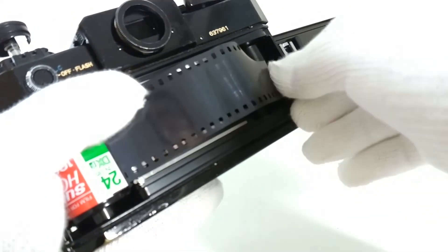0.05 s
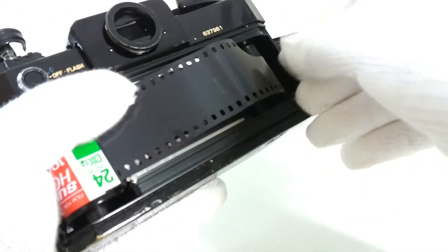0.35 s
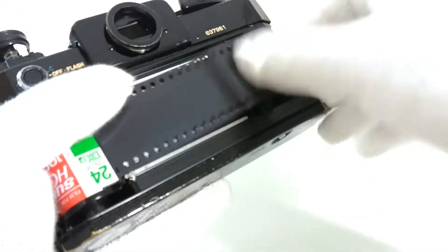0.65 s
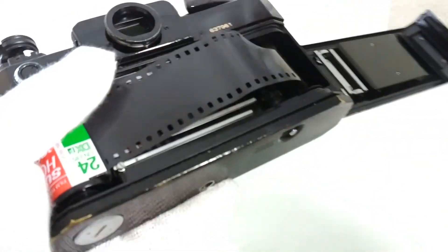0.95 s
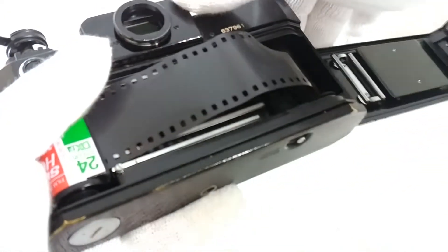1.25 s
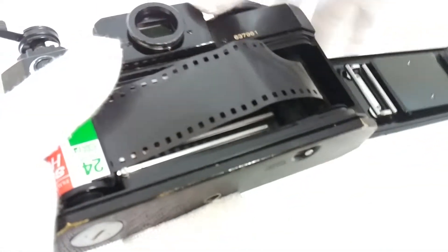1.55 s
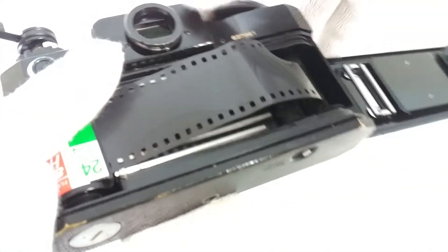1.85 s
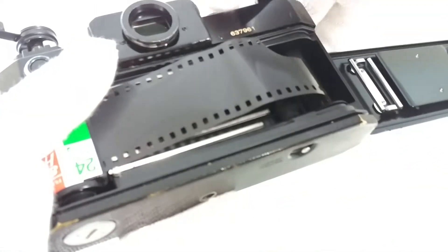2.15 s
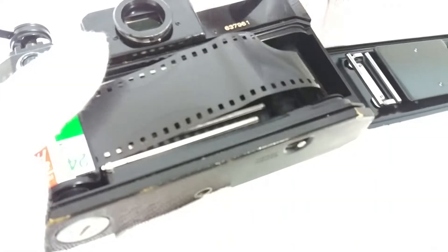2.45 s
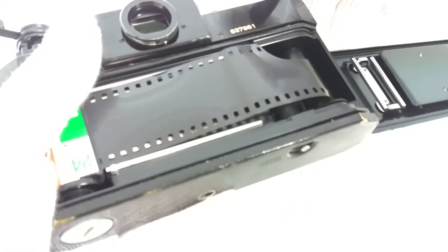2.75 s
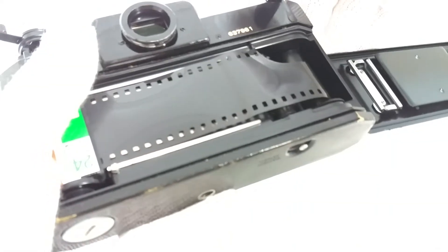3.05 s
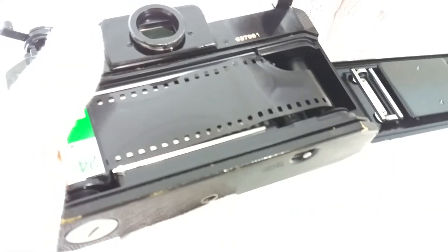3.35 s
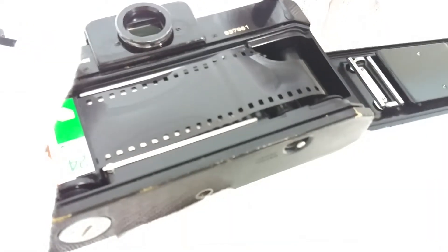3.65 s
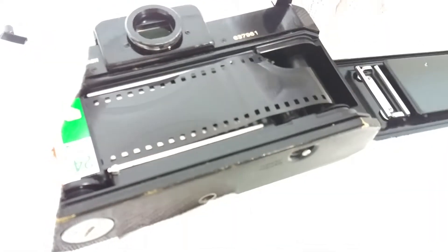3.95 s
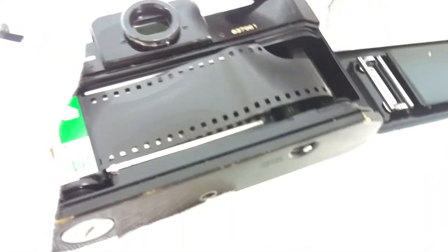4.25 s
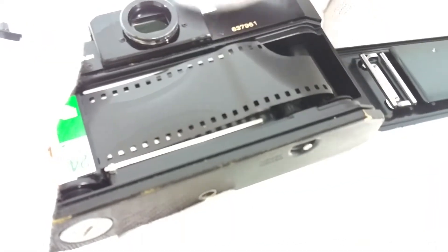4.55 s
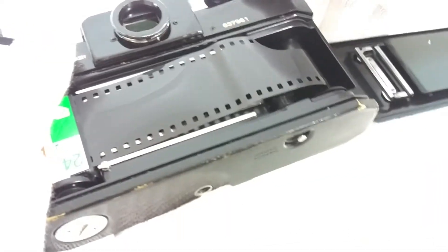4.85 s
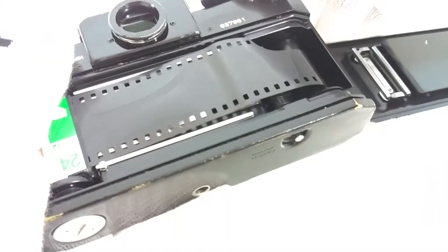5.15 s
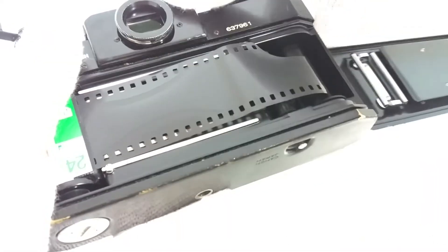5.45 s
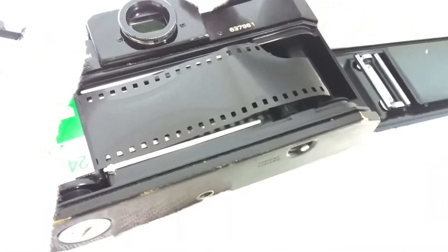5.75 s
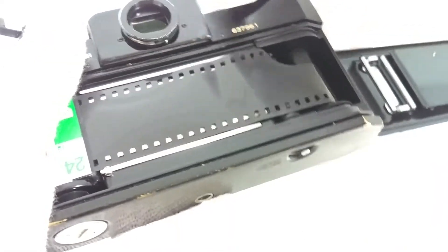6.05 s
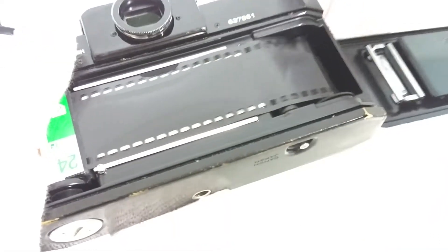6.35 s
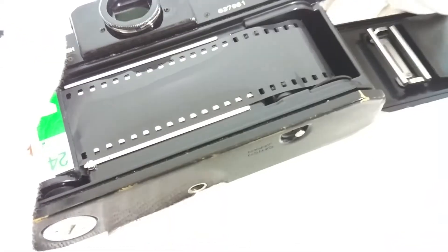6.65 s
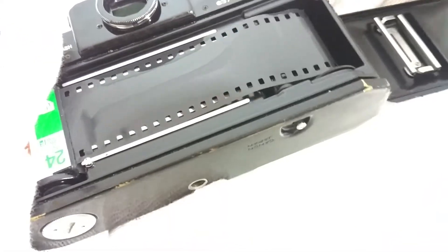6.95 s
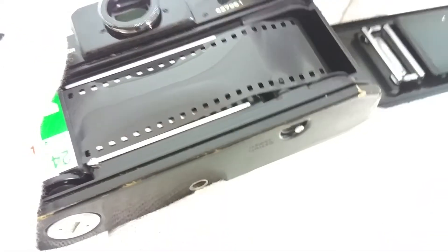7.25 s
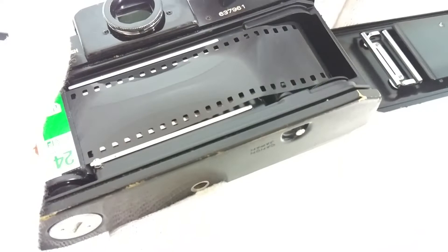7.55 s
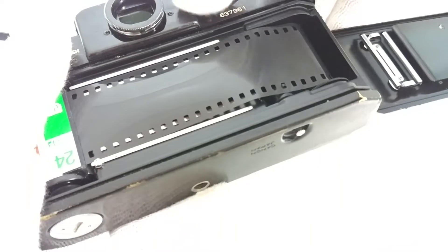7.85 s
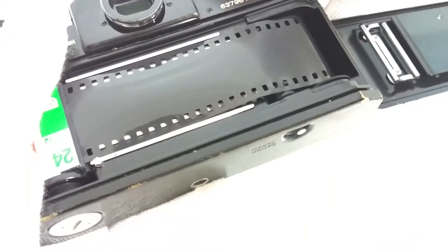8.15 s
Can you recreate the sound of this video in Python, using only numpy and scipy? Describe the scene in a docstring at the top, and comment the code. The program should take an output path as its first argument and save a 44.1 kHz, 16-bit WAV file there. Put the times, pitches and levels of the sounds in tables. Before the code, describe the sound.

Film ticks into an open camera, the shutter fires with sharp metal clacks, and a lever winds on in gritty pulls.

```python
"""A quiet room with a low hum; close up, gloved fingers load film into an open metal camera.
The hinged back knocks against its stop, and the leader ticks and slides into the spool.
The shutter fires, its gear train buzzes through a slow exposure, and the mirror bounces home.
The lever drags the film over the sprockets in gritty pulls and snaps back. Each click is a noise
burst ringing the metal case; underneath, cotton rubs and the camera rocks softly in the hand."""
import sys
import numpy as np
from scipy import signal
from scipy.fft import rfft, irfft, next_fast_len
from scipy.io import wavfile
from scipy.ndimage import uniform_filter1d

SR = 44100
rng = np.random.default_rng(int(sys.argv[2]) if len(sys.argv) > 2 else 0)


def wav_out(sig):
    """Save sig, one row per channel (or a flat mono array), as 16-bit PCM at SR to the path in sys.argv[1]."""
    wavfile.write(sys.argv[1], SR, np.round(np.clip(np.atleast_2d(sig).T, -1, 1) * 32767).astype(np.int16))


N = 371322
TIME = np.arange(N) / SR
TAPS = 8192
BINS = np.fft.rfftfreq(TAPS, 1 / SR)

# release, mirror flip, opening and closing curtain: (time [s], level [dB], knock [dB], ring [Hz], t60 [s])
SHUTTER_HITS = [(5.1475, -4, 0, 2880, .03), (5.1502, 7, 12, 420, .033), (5.157, 5.5, 2, 2500, .05),
                (5.1695, -1.5, 11, 880, .02), (5.183, 2, 2, 7140, .06), (5.1915, 4.5, 1, 5530, .045),
                (5.335, 1.5, 5, 1860, .05), (5.34, 6, 11, 800, .04), (5.344, 7, 8, 1200, .045),
                (5.3565, 2.5, 3.5, 1070, .035)]
# the mirror landing on its rest: (time [s], level [dB], knock [dB], ring [Hz], t60 [s])
MIRROR_DROP = (5.375, 2.5, 7, 3300, .022)
# ticks of film, spool and ratchet: (time [s], level [dB], knock [dB], ring [Hz], t60 [s])
TICK_HITS = [(.0095, -10.5, -12, 5050, .01), (.023, -10.5, -11, 5200, 0.037), (.046, -13.5, -4, 7100, .02),
             (.051, -9.5, 4.5, 4800, .03), (.066, -19, 1, 1460, .035), (.094, -24.5, 1, 2250, 0.054),
             (.33, -33.5, -1, 8050, .025), (1.359, -33, 10, 4930, .045), (1.649, -24, 4, 11000, .04),
             (2.393, -16, 3, 3300, 0.057), (2.403, -16.5, -8, 10000, 0.022), (2.557, -31.5, 8, 2810, 0.044),
             (2.6, -22, 4, 2380, .02), (2.6365, -19, -0.5, 2700, 0.034), (2.6644, -18, 1, 5900, .01),
             (2.887, -19, 1.5, 2900, .02), (2.903, -12.5, -5, 9500, 0.014), (2.905, -29, 11, 1150, .08),
             (4.192, -23, 6.5, 6300, 0.064), (4.266, -26, -1, 6440, 0.028), (4.311, -23.5, 18, 2320, .04),
             (5.479, -30, 5, 2040, .04), (6.078, -23, -2, 13700, 0.062), (6.116, -20.5, 21.5, 1420, .025),
             (6.184, -16.5, 9.5, 2700, .06), (6.2185, -14.5, 3, 3080, .012),
             (6.2465, -19.5, -12, 6600, .02), (6.3385, -3.5, 4, 7100, .008), (6.35, -9.5, 6, 2960, 0.045),
             (6.3995, -8, 3, 2280, .025), (6.408, -11.5, 14.5, 2460, 0.025),
             (6.4585, -11, -12, 8900, 0.017), (6.513, -4.5, -2, 7070, .016), (6.544, -14.5, 7.5, 2350, .04),
             (6.554, -9.5, -13, 5450, 0.028), (6.603, -18, 4, 1390, .05), (6.7105, -15.5, 13, 2550, .035),
             (6.7245, -13, -2, 8350, .014), (6.7315, -9, -8, 9500, .012), (7.017, -26.5, 10, 5240, .05),
             (7.058, -16, 3, 5300, .025), (7.1255, -21, 11, 1600, .05)]
# the ring shared by the metal hits: (frequency [Hz], width [Hz], boost [dB])
METAL_MODES = [(797, 90, 2.5), (1298, 70, 4), (1970, 14, 3), (2150, 50, 1), (2820, 60, 5.5), (3580, 23, 3),
               (4276, 26, 0), (5180, 68, 6), (5540, 120, 9), (6118, 52, 6), (6300, 37, 7.5),
               (8600, 80, 0.5), (9250, 66, 5.5), (15015, 90, 0.5)]
# broad tone shared by the clicks, dipping near 12 kHz: (frequency [Hz], gain [dB])
CLICK_EQ = [(60, -1.5), (200, -2), (7000, -3.5), (10000, -3), (11800, -9), (14000, -1.5), (15500, -2.5)]
# resonances of the slow-speed gear train: (frequency [Hz], width [Hz], gain [dB])
GEAR_MODES = [(1499, 2500, -12.5), (5700, 700, -10), (6520, 300, -13.5), (7100, 350, 1), (9010, 900, -4),
              (10400, 400, -4), (13900, 1100, -5), (15200, 700, -3.5)]
# envelope of the gear whirr: (time [s], level [dB])
GEAR_ENVELOPE = [(5.19, -68), (5.2, -33), (5.22, -45), (5.27, -47), (5.312, -46.5), (5.319, -39),
                 (5.335, -27), (5.35, -56)]
# springs left ringing: (start [s], damped at [s], pitch [Hz], level [dB], t60 [s])
SPRING_RINGS = [(5.194, 5.34, 921, -41.5, 0.5), (5.185, 5.34, 1000, -49, .3), (5.194, 5.34, 2024, -52, .3),
                (5.34, 6.1, 2019, -51.5, .62)]
# pulls of film over the sprockets: (start [s], length [s], level [dB])
FILM_PULLS = [(6.088, 0.087, -56.5), (6.186, 0.068, -48), (6.28, .06, -60), (6.343, .18, -43.5),
              (6.554, 0.072, -41.5), (6.641, 0.12, -54.5)]
# rasp of the dragged film: (frequency [Hz], gain [dB])
RASP_EQ = [(300, -3), (700, 2.5), (1500, 1), (2800, -1.5), (4000, -14.5), (5600, -7.5), (9500, -9),
           (11800, -23), (14500, -17), (16000, -12)]
# the wind lever at its stop: (frequency [Hz], width [Hz], gain [dB])
LEVER_MODES = [(1320, 140, 26.5), (1646, 130, 24.5), (2340, 270, 3), (3030, 200, 6), (3960, 550, 2),
               (5470, 440, -0.5), (7200, 1200, -7), (9800, 900, -19), (13800, 700, -11.5),
               (15500, 600, -28)]
# the hinged back at its stop: (frequency [Hz], width [Hz], gain [dB])
BACK_MODES = [(260, 58, 9.5), (800, 62, 12.5), (1195, 95, 8), (1460, 87, -9), (2000, 200, -24),
              (2570, 54, -0.5), (3420, 147, -16), (4130, 190, -4.5), (4900, 400, -8.5), (5930, 360, -7.5),
              (8500, 500, -24), (10600, 500, -27), (14800, 1200, -25)]
# the leader sliding into its slot: (time [s], level [dB], squeak pitch [Hz])
LEADER_SLIDE = [(2.19, -91, 6040), (2.235, -67, 5510), (2.27, -60.5, 4700), (2.3, -63, 6570),
                (2.35, -75, 6460), (2.39, -65, 6560)]
# resonances of the slot, applied twice over: (frequency [Hz], width [Hz], gain [dB])
SLOT_MODES = [(4130, 380, 1.5), (5050, 300, -5), (5600, 300, 0.5), (6560, 400, -3)]
# the film edge running along the guide rail: (time [s], level [dB])
RAIL_ENVELOPE = [(1.78, -87), (1.91, -74), (2.04, -75.5), (2.12, -88)]
# its faint singing tone: (frequency [Hz], width [Hz], gain [dB])
RAIL_RESONANCES = [(5140, 60, 1), (6400, 90, 5), (8600, 180, -2), (10100, 330, 0)]
# strokes of cotton on the camera: (middle [s], length [s], level [dB])
GLOVE_STROKES = [(0.333, 0.33, -61), (0.746, 0.26, -57.5), (0.888, .15, -55), (1.049, .22, -54),
                 (1.265, .12, -51.5), (1.357, 0.26, -56), (1.62, 0.1, -53.5), (1.719, 0.19, -53.5),
                 (1.99, 0.11, -56), (2.116, 0.12, -55), (2.287, 0.39, -54), (2.66, 0.42, -55),
                 (3.319, 0.093, -58.5), (4.028, 0.086, -55.5), (4.625, 0.17, -61.5), (4.29, 0.4, -54),
                 (7.072, 0.33, -50.5), (7.291, .3, -53.5)]
# light finger slides, one curve before the shutter and one after the winding: (time [s], level [dB])
FINGER_SLIDES = [
    [(0.1, -72), (0.36, -81), (0.68, -80), (0.82, -75.5), (1.2, -73), (1.35, -83), (1.59, -74), (1.76, -76),
     (2.23, -76.5), (2.45, -71), (2.91, -79), (3.15, -89), (4.31, -84), (5.1, -82.5)],
    [(6.8, -70.5), (7.11, -74.5), (7.486, -89.5), (8.4, -90)],
]
# loose film brushing a glove: (middle [s], length [s], level [dB])
FILM_BRUSHES = [(1.63, .14, -72), (3.67, .17, -75), (3.89, .14, -79), (4.75, .25, -81)]
# dull rub of cotton: (frequency [Hz], gain [dB])
RUB_EQ = [(40, -22.5), (100, 2), (250, -4), (500, -10.5), (1000, -15.5), (1500, -19.5), (2800, -25),
          (3600, -43), (6000, -41.5), (12000, -58.5)]
# fine hiss of its fibres: (frequency [Hz], gain [dB])
FIBRE_EQ = [(1500, -17.5), (3000, 0), (4400, -3), (6300, -2), (7800, -3.5), (10000, -2.5), (11900, -6.5),
            (14500, -0.5), (16000, -0.5)]
# pushes of the hand and blows of the shutter that rock the camera: (time [s], pitch [Hz], level [dB])
BODY_BUMPS = [(.328, 48.2, -38.5), (1.02, 68, -43), (2.369, 85, -42), (2.549, 58.4, -41),
              (4.292, 100, -37.5), (5.15, 126, -32.5), (5.184, 62, -36), (5.331, 162, -30.5),
              (6.313, 91.6, -31), (6.334, 148, -32.5), (6.754, 48, -29.5), (7.028, 111.7, -32),
              (7.063, 58, -32.5), (7.24, 60, -39)]
# tones of the hum: (pitch [Hz], level [dB])
HUM_TONES = [(49, -52.5), (100, -63)]
# still air of the room: (frequency [Hz], gain [dB])
ROOM_TONE_EQ = [(15, -34.5), (28, -23.5), (42, -7), (62, -11), (80, -0.5), (120, -2.5), (160, -6.5),
                (400, -15), (630, -17), (1600, -31.5), (2800, -34.5), (4000, -44), (6300, -52.5),
                (10000, -48.5), (16000, -52)]
# decay of the room tail: (frequency [Hz], t60 [s])
REVERB_DECAY = [(200, 0.18), (1500, 0.24), (5000, 0.19), (15000, .2)]
# send to the room tail: (frequency [Hz], gain [dB])
REVERB_SEND = [(200, -20.5), (1500, -22), (5000, -18.5), (15000, -27.5)]


def shutter():
    """The release trips, the mirror flips up and two curtains slam home: full-bodied metal clacks."""
    return metal_hits(SHUTTER_HITS, ring_db=8, thud_db=-1, thud_share=.45, sizzle_db=-.5,
                      dulling=.04, metal_share=1, tail_db=-14.5, tail_t60=.21)


def mirror(first_gap_s=.035, gap_ratio=.53, loss_db=8, count=5):
    """The mirror drops onto its rest, each bounce sooner and softer."""
    start, db, knock_db, ring_hz, t60 = MIRROR_DROP
    gaps = first_gap_s * gap_ratio ** np.arange(count - 1)
    times = start + np.r_[0, np.cumsum(gaps)]
    bounces = [(at, db - k * loss_db, knock_db, ring_hz, t60) for k, at in enumerate(times)]
    return metal_hits(bounces, ring_db=12, thud_db=-6.5, thud_share=.33, sizzle_db=-2.5,
                      dulling=.2, metal_share=1, tail_db=-15, tail_t60=.21)


def ticks():
    """Film, spool and ratchet catch with small pitched clicks."""
    return metal_hits(TICK_HITS, ring_db=12.5, thud_db=-5, thud_share=.71, sizzle_db=-1,
                      dulling=.19, metal_share=.7, tail_db=-11, tail_t60=.2)


def metal_hits(rows, ring_db, thud_db, thud_share, sizzle_db, dulling, metal_share, tail_db, tail_t60):
    """A crack pitched by the struck part, then a soft case ring; more knock adds thud and cuts sizzle."""
    out = np.zeros(N)
    shared_db = curve(CLICK_EQ, BINS) + np.minimum(metal_share * metal_ring_db(), 9)
    for start, db, knock_db, ring_hz, t60 in rows:
        tilt_db = curve([(450, thud_db + thud_share * knock_db), (1500, knock_db),
                         (4500, 0), (11000, sizzle_db - dulling * knock_db)], BINS)
        # each hit lands on another spot and favours other resonances
        ripple = uniform_filter1d(rng.standard_normal(len(BINS)), size=30)
        spot_db = 2.5 * unit_rms(uniform_filter1d(ripple, size=30))
        hit_db = db + shared_db + tilt_db + spot_db
        part_db = ring_db / (1 + ((BINS - ring_hz) / (120 + .042 * ring_hz)) ** 2)
        crack = rattle(t60) + .25 * signal.unit_impulse(TAPS)  # the impulse is the first contact
        add(out, start, colour(crack, amp(hit_db + part_db)))
        add(out, start, colour(rattle(tail_t60), amp(hit_db + tail_db + .3 * part_db)))
    return out


def clockwork(tooth_hz=200, floor_db=-13):
    """The gear train whirrs, a puff of noise per tooth, while the shutter is open; springs ring on."""
    tooth_phase = np.cumsum(tooth_hz * (1 + .06 * drift(57.7))) / SR % 1
    buzz = (amp(floor_db) + np.exp(-tooth_phase / .22)) * rng.standard_normal(N)
    out = envelope(GEAR_ENVELOPE) * unit_rms(colour(buzz, resonances(GEAR_MODES)))
    for start, damped, hz, db, t60 in SPRING_RINGS:
        t = np.arange(0, damped - start, 1 / SR)
        add(out, start, amp(db - 60 * t / t60) * np.sin(2 * np.pi * hz * t))
    return out


def winding(attack_s=.0077, release_s=.029, fade_db_per_s=65, metal_share=.6, contacts=4):
    """Film and gears grind in gritty slips; each contact has its own rattle and rings the metal."""
    drag = np.zeros(N)
    for start, length, db in FILM_PULLS:
        t = np.arange(0, length + release_s, 1 / SR)
        gate = np.clip(np.minimum(t / attack_s, (t[-1] - t) / release_s), 0, 1)
        add(drag, start, amp(db - fade_db_per_s * t) * gate)
    slips = sum(signal.oaconvolve(grains(300, spread_db=2), rattle(.018, smooth_bins=800))[:N]
                for _ in range(contacts))
    rasp_db = curve(RASP_EQ, BINS) + metal_share * metal_ring_db()
    return drag * unit_rms(colour(slips, amp(rasp_db)))


def wind_lever():
    """The lever snaps home with a hard midrange clack."""
    return end_stop(7.1385, LEVER_MODES, db=-3.7, t60=.0072, low_cut_hz=950,
                    gap_s=.0021, loss_db=2.5, tail_db=-19.5, tail_t60=.22)


def hinged_back():
    """The back swings open against its stop with a hollow knock."""
    return end_stop(.6755, BACK_MODES, db=-1, t60=.01, low_cut_hz=138,
                    gap_s=.0025, loss_db=3, tail_db=-10, tail_t60=.17)


def end_stop(start, modes, db, t60, low_cut_hz, gap_s, loss_db, tail_db, tail_t60, count=3):
    """A swinging part hits its stop, bounces and rings on, radiating little low end."""
    hits = np.zeros(N)
    for k in range(count):
        add(hits, start + k * gap_s, amp(db - k * loss_db) * rattle(t60))
    add(hits, start, amp(db + tail_db) * rattle(tail_t60))
    low_cut = BINS ** 3 / (BINS ** 3 + low_cut_hz ** 3)
    return colour(hits, resonances(modes) * low_cut)


def film_leader(slot_db=-2, squeak_db=-5):
    """Film sings on the rail, then hisses into the slot with a wandering squeak."""
    rail = unit_rms(colour(rng.standard_normal(N), resonances(RAIL_RESONANCES)))
    times, _, hz = np.transpose(LEADER_SLIDE)
    squeak_phase = 2 * np.pi * np.cumsum(np.interp(TIME, times, hz)) / SR
    squeak = unit_rms(drift(350) * np.cos(squeak_phase))
    slot = unit_rms(colour(rng.standard_normal(N), resonances(SLOT_MODES) ** 2))
    slide = amp(slot_db) * slot + amp(squeak_db) * squeak
    return envelope(RAIL_ENVELOPE) * rail + envelope(LEADER_SLIDE) * slide


def gloves(stroke_hiss_db=-21, slide_hiss_db=-.5, slide_rub_db=7, fidget_db=-69):
    """Cotton strokes swell over lighter sliding: a dull rub of catching threads and a fine fibre hiss."""
    strokes = swells(GLOVE_STROKES)
    brushes = swells(FILM_BRUSHES)
    sliding = sum(envelope(slide) for slide in FINGER_SLIDES)
    fidget = amp(fidget_db + 5 * np.clip(drift(6), -2, 2))  # the holding hand is never quite still
    rub_gain = np.linalg.norm([strokes, amp(slide_rub_db) * sliding, fidget], axis=0)
    hiss_layers = [amp(stroke_hiss_db) * strokes, amp(slide_hiss_db) * sliding, brushes]
    hiss_gain = np.linalg.norm(hiss_layers, axis=0)
    rub = unit_rms(colour(grains(4500, spread_db=2), amp(curve(RUB_EQ, BINS))))
    hiss = unit_rms(colour(grains(9000, spread_db=.5), amp(curve(FIBRE_EQ, BINS))))
    grip_db = 2 * drift(53)  # the grip catches and lets go; the hiss follows it less
    return rub_gain * rub * amp(grip_db) + hiss_gain * hiss * amp(grip_db / 2)


def body_bumps(attack_s=.01, t60_cycles=11):
    """Soft pushes of the hand and the shutter's blows rock the whole camera for a few cycles: low thumps."""
    out, t = np.zeros(N), np.arange(SR // 2) / SR
    for start, hz, db in BODY_BUMPS:
        attack = 1 - np.exp(-t / attack_s)
        decay = amp(db - 60 * t * hz / t60_cycles)
        add(out, start, 2 * attack * decay * np.sin(2 * np.pi * hz * t))
    return out


def room_tail(dry, fade_in_s=.0038):
    """The small room answers with a short, quiet wash of reflections."""
    hz, t, spectrum = signal.stft(rng.standard_normal(SR // 2), SR, nperseg=256)
    t60 = curve(REVERB_DECAY, hz)[:, None]
    decay = amp(curve(REVERB_SEND, hz)[:, None] - 60 * t / t60)
    energy_trim = np.sqrt(2 * np.log(1000) / (t60 * SR))
    tail = signal.istft(spectrum * decay * energy_trim, SR, nperseg=256)[1]
    fade_in = np.minimum(np.arange(len(tail)) / SR / fade_in_s, 1)
    return signal.fftconvolve(dry, tail * fade_in)[:N]


def room_bed(air_db=-59, waver=.38):
    """A low hum, wavering in level and phase, over the still air of the room."""
    hum = np.zeros(N)
    for hz, db in HUM_TONES:
        wobble = 1 + waver * drift(20)
        phase = 2 * np.pi * hz * TIME + waver * drift(12)
        hum += amp(db) * unit_rms(wobble * np.cos(phase))
    air = unit_rms(colour(rng.standard_normal(N), amp(curve(ROOM_TONE_EQ, BINS))))
    return hum + amp(air_db) * air


def rattle(t60, smooth_bins=120):
    """One hit scattered through many small parts: a dying noise burst of energy 1."""
    t = np.arange(TAPS) / SR
    spectrum = rfft(rng.standard_normal(TAPS) * amp(-60 * t / max(t60, .002)))
    spectrum /= np.sqrt(uniform_filter1d(abs(spectrum) ** 2, smooth_bins))  # flat, with narrow peaks
    burst = irfft(spectrum) * np.cos(np.pi / 2 * t / t[-1]) ** 2
    return burst / np.linalg.norm(burst)


def grains(per_s, spread_db):
    """Friction grit: tiny slips of uneven size at random moments."""
    at = np.flatnonzero(rng.random(N) < per_s / SR)
    size_db = spread_db * np.minimum(rng.exponential(1, len(at)), 4)
    out = np.zeros(N)
    out[at] = amp(size_db) * rng.standard_normal(len(at))
    return unit_rms(out)


def drift(hz):
    """Smooth random modulation of rms 1, rolling off above hz."""
    size = next_fast_len(N, True)
    low_pass = np.exp(-(np.fft.rfftfreq(size, 1 / SR) / hz) ** 2)
    return unit_rms(irfft(rfft(rng.standard_normal(size)) * low_pass, size)[:N])


def metal_ring_db():
    """The metal's resonances as narrow EQ boosts."""
    return sum(db / (1 + (2 * (BINS - hz) / width) ** 2) for hz, width, db in METAL_MODES)


def resonances(modes):
    """Gain by frequency of resonances summed in power."""
    return np.sqrt(sum(amp(db) ** 2 / (1 + ((BINS ** 2 - hz ** 2) / (BINS * width + 1)) ** 2)
                       for hz, width, db in modes))


def colour(x, gain):
    """Minimum-phase EQ: the ringing follows the transient."""
    log_gain = np.log(np.maximum(gain, 1e-5))
    mirrored = np.r_[log_gain, log_gain[-2:0:-1]]
    response = np.fft.ifft(np.exp(np.conj(signal.hilbert(mirrored)))).real
    return signal.oaconvolve(x, response[:TAPS // 2])[:len(x)]


def curve(points, hz):
    """Breakpoints joined by straight lines over log frequency."""
    point_hz, value = np.transpose(points)
    return np.interp(np.log(hz + 1), np.log(point_hz + 1), value)


def envelope(rows):
    """Gain along a dB fader curve, silent outside it."""
    times, db = np.transpose(rows)[:2]
    return amp(np.interp(TIME, times, db)) * (TIME >= times[0]) * (TIME <= times[-1])


def swells(rows):
    """Gain of smooth swells, each around its middle."""
    out = np.zeros(N)
    for middle, length, db in rows:
        add(out, middle - length / 2, amp(db) * np.hanning(int(length * SR)))
    return out


def amp(db):
    return 10 ** (np.asarray(db) / 20)


def unit_rms(x):
    return x / np.sqrt(np.mean(x ** 2) + 1e-20)


def add(mix, start_s, sound):
    part = mix[max(round(start_s * SR), 0):][:len(sound)]
    part += sound[:len(part)]


def scene():
    """Mono mix: the mechanism with its room tail, dry handling, and the room bed beneath."""
    hits = ticks() + shutter() + mirror() + hinged_back() + wind_lever()
    camera = hits + clockwork() + film_leader() + winding()
    return (camera + room_tail(camera) + gloves() + body_bumps() + room_bed())[None]


def record(dry):
    """Master EQ: roll off the sub bass below 36 Hz and the top above 16 kHz."""
    low_cut = signal.butter(4, 36, "high", fs=SR, output="sos")
    high_cut = signal.firwin(301, 16000, window=("kaiser", 7), fs=SR)
    return signal.oaconvolve(signal.sosfilt(low_cut, dry), high_cut[None], "same")


dry = scene()
out = record(dry)
wav_out(out)
```